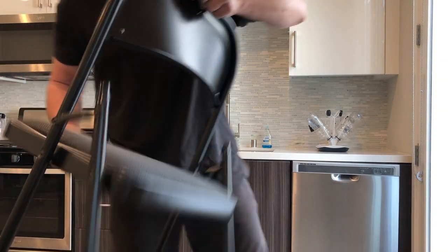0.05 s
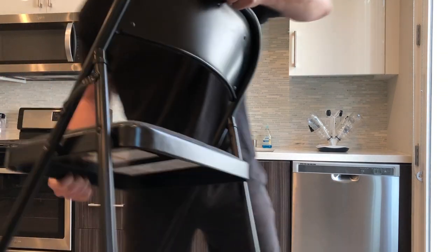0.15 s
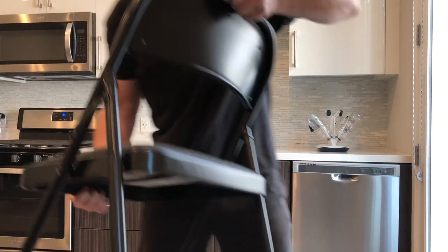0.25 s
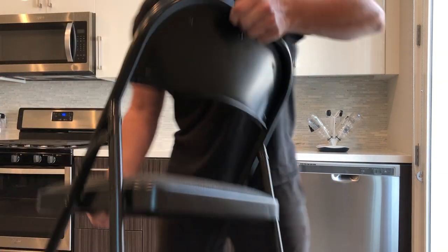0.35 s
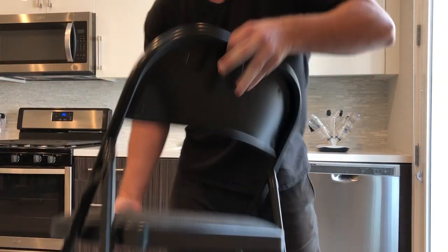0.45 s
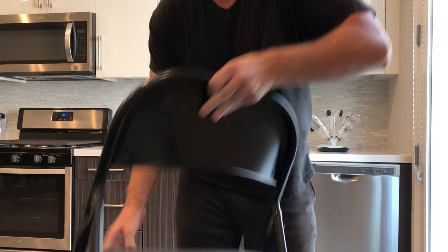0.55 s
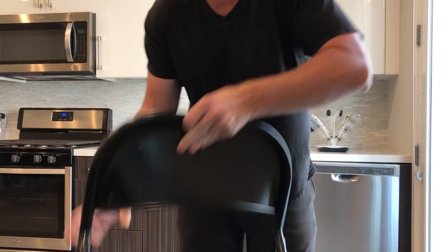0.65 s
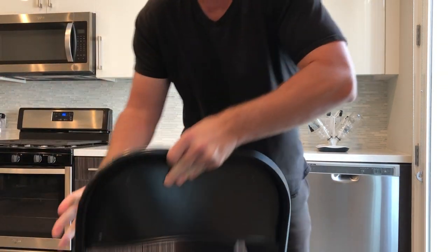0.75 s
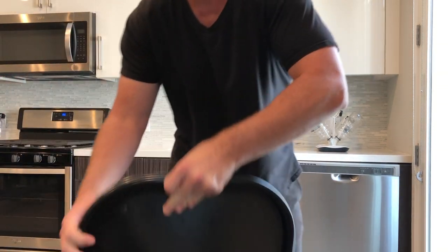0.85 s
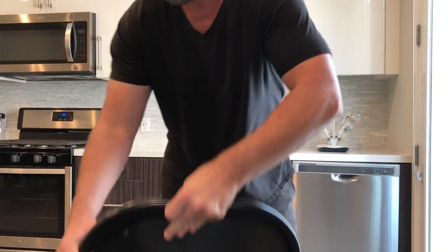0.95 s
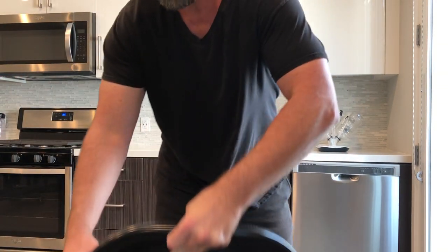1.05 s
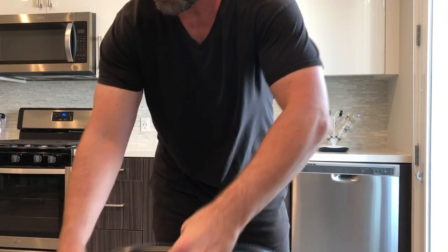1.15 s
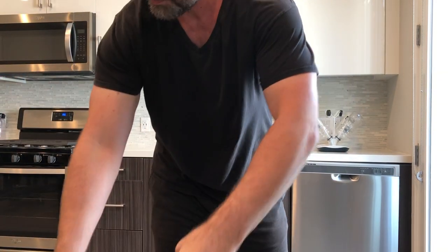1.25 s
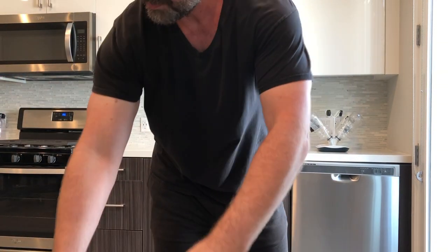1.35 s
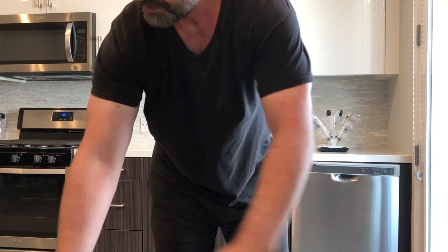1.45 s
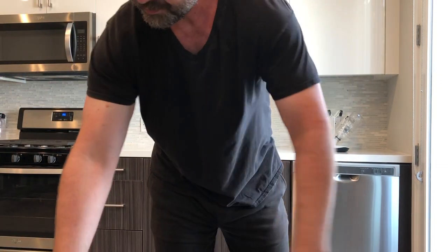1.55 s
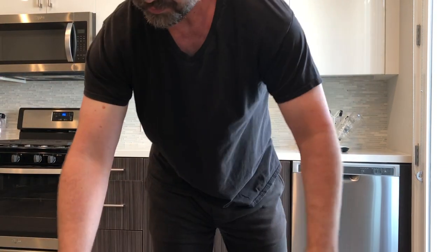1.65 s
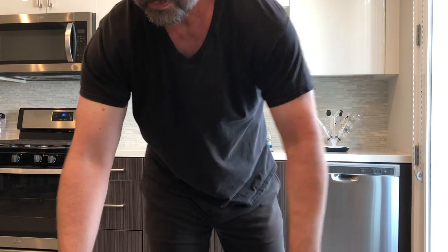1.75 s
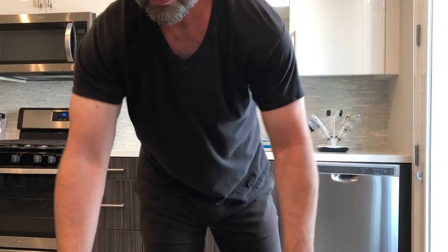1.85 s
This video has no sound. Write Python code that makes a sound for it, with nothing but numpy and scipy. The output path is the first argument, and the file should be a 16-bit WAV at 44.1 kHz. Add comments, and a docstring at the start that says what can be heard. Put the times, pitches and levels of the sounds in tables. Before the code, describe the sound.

A metal folding chair snaps open with a loud clack, then its feet knock on hard floor

```python
"""A metal folding chair clicks in its hinge, snaps open with a loud clack, then is set down: its feet
knock and skid on a hard kitchen floor, over faint air, rumble and rustling clothes. The room rings for
most of a second. Contacts are bursts of coloured noise; frame, tubes and legs are dying sines; echoes
are sparse taps decaying band by band. Both channels are the same."""
import sys
import numpy as np
from scipy import signal
from scipy.fft import rfft, irfft
from scipy.io import wavfile
from scipy.ndimage import uniform_filter1d

SR = 44100
rng = np.random.default_rng(int(sys.argv[2]) if len(sys.argv) > 2 else 0)


def generate_wav(sig):
    """Save sig (samples, or channels by samples) to the path in sys.argv[1] as 16-bit PCM at SR."""
    pcm = np.round(np.clip(np.atleast_2d(sig).T, -1, 1) * 32767).astype(np.int16)
    wavfile.write(sys.argv[1], SR, pcm)


def how_loud(loudness_db):
    """Turn decibels into a plain amplitude multiplier (0 dB gives 1, 20 dB gives 10)."""
    steps = np.asarray(loudness_db, float) / 20
    return 10 ** steps


N = 83790

# the seat hits its stop: (time [s], level [dB], length [s], rise [s], brightness [dB per octave])
CLACK_HITS = [(0.2467, -10.5, 0.008, 0.0011, 3.5), (.2485, -11, 0.0079, 0.0017, -3)]


def evened(x):
    """Scales to unit rms."""
    return x / np.sqrt(np.mean(x ** 2) + 1e-20)


def read(points, hz):
    """Interpolates a table on a log-frequency axis."""
    f, value = np.transpose(points)
    return np.interp(np.log(hz + 1), np.log(f + 1), value)


def add(mix, time_s, sound):
    """Adds a sound into the mix at a time, cut at the end."""
    part = mix[round(time_s * SR):][:len(sound)]
    part += sound[:len(part)]


def coloured(spectrum, count, tilt_db=0):
    """Noise of unit rms with a given spectrum, tilted in dB per octave."""
    hz = np.fft.rfftfreq(count, 1 / SR)
    gain_db = read(spectrum, hz) + tilt_db * np.log2(hz / 2000 + 0.064)
    white = rfft(rng.standard_normal(count))
    return evened(irfft(white * how_loud(gain_db), count))


def bursts(rows, spectrum, grain_db):
    """Each blow is a short rattle of uneven contacts: quick rise, quick fall."""
    out, t = np.zeros(N), np.arange(4096) / SR
    for time_s, db, length_s, rise_s, tilt_db in rows:
        wander = evened(uniform_filter1d(rng.standard_normal(len(t)), size=30))
        lumps = how_loud(grain_db * wander)
        shape = np.minimum(t / rise_s, 1) * np.exp(-(t / length_s) ** 2)
        add(out, time_s, how_loud(db) * shape * lumps * coloured(spectrum, len(t), tilt_db))
    return out


def rings(modes, length_s=1):
    """The sum of dying sines that a unit blow leaves."""
    t = np.arange(round(length_s * SR)) / SR
    return sum(how_loud(db - 60 * t / t60_s) * np.sin(2 * np.pi * hz * t) for hz, db, t60_s in modes)


def rung(x, modes, db):
    """A rattle passed through modes whose summed response has unit energy."""
    ring = rings(modes)
    return how_loud(db) * signal.fftconvolve(x, ring / np.linalg.norm(ring))[:N]


def rumble():
    """Low noise: slow noise on a quadrature carrier puts a band around a moving centre."""
    # (time [s], level [dB], centre [Hz])
    course = [(0, -41, 84), (.04, -60, 83), (.09, -50.5, 90), (.14, -71, 90), (0.171, -71, 86.4),
              (.9, -69.5, 59.7), (0.971, -51.5, 52.1), (1.05, -57, 46.16), (1.12, -60.5, 50.2),
              (1.18, -60, 49), (1.369, -75, 60.7), (1.43, -50, 64.2), (1.49, -80.5, 64.81), (1.55, -51, 69),
              (1.6, -47.5, 70.6), (1.7, -51.5, 72.9), (1.76, -65, 74.4), (1.9, -64, 62.4)]
    width_hz = 41
    time_s, db, hz = np.transpose(course)
    t = np.arange(N) / SR
    lowpass = signal.butter(2, width_hz / 2, fs=SR, output="sos")
    slow = signal.sosfilt(lowpass, rng.standard_normal((2, N)))
    phase = 2 * np.pi * np.cumsum(np.interp(t, time_s, hz)) / SR
    band = slow[0] * np.cos(phase) + slow[1] * np.sin(phase)
    return how_loud(np.interp(t, time_s, db)) * evened(band)


def air():
    """Air of the room: steady coloured noise."""
    # relative spectrum: (frequency [Hz], density [dB per Hz])
    spectrum = [(30, -29), (60, -15), (150, 8), (350, 3.5), (900, -6), (2500, -11.5), (6000, -19),
                (10000, -24.5), (16000, -39)]
    level_db = -60
    return how_loud(level_db) * coloured(spectrum, N)


def hinge_ticks():
    """Light metal contacts in the hinge: short noise bursts."""
    # (time [s], level [dB], length [s], rise [s], brightness [dB per octave])
    ticks = [(.1260, -40, 0.0067, 0.00063, 1.2), (.1966, -38.5, 0.0061, 0.002, -0.2),
             (.2290, -42.5, .012, .002, -5), (.600, -52.5, 0.018, .006, 2), (.665, -58, 0.022, .01, -2),
             (1.119, -68, 0.0039, 0.0011, -7)]
    # relative spectrum before tilt: (frequency [Hz], density [dB per Hz])
    spectrum = [(120, -31), (200, -12), (671, -34), (821, -11), (1420, -10.5), (1910, 2), (2250, -8),
                (4350, -16.5), (7270, -17.5), (9930, -22), (11700, -15), (16000, -24)]
    return bursts(ticks, spectrum, grain_db=2.5)


def tail():
    """Dense echoes that build up quickly, each band dying at its own speed; unit energy."""
    # decay of the room: (frequency [Hz], t60 [s])
    decay = [(80, 0.17), (210, 0.66), (560, 0.83), (1470, 0.83), (3880, 0.99), (7000, 0.73), (10500, 0.56),
             (16000, 0.32)]
    first_echo_s, build_s = 0.003, 0.0037
    taps = np.zeros(SR + SR // 2)
    at = np.arange(round(first_echo_s * SR), len(taps) - 8, 8)
    at = at + rng.integers(0, 8, len(at))
    taps[at] = rng.choice([-1., 1.], len(at))
    hz, t, z = signal.stft(taps, SR, nperseg=256)
    dying = z * how_loud(-60 * t / read(decay, hz)[:, None])
    echoes = signal.istft(dying, SR, nperseg=256)[1]
    echoes = echoes * (1 - np.exp(-np.arange(len(echoes)) / SR / build_s))
    return echoes / np.linalg.norm(echoes)


def room(rattle, steady):
    """Several random tails share the rattle in turn, which evens out the colour of the reverberation."""
    tails, turn_s = 6, 0.0014  # turn_s: time from one tail to the next
    turn = np.arange(N) / SR / turn_s
    out = signal.fftconvolve(steady, tail())[:N]
    for k in range(tails):
        away = np.abs((turn - k + tails / 2) % tails - tails / 2)
        share = np.cos(np.pi / 2 * np.minimum(away, 1))
        out += signal.fftconvolve(rattle * share, tail())[:N]
    return out


def clack():
    """The seat hits its stop: loud noise bursts."""
    # relative spectrum before tilt: (frequency [Hz], density [dB per Hz])
    spectrum = [(120, -47), (250, -18.5), (390, -6), (700, -9), (1100, -5), (1450, -10.5), (1800, -1),
                (2300, -14), (2850, -12), (3600, -16.5), (6300, -17), (8000, -19), (12000, -26.5),
                (14300, -22), (16500, -38.5)]
    return bursts(CLACK_HITS, spectrum, grain_db=3)


def tubes():
    """The clack sets the tubes ringing thinly, each mode with its own phase."""
    # (frequency [Hz], level [dB], t60 [s])
    modes = [(1238, -35, .3), (1270, -39, .5), (1610, -38, .7), (1675, -33, .75), (1707, -32, .8),
             (1738, -31, .8), (1765, -34, .7), (1790, -32, .7), (1840, -32, .75), (1890, -31, .5),
             (1928, -35, .55), (2060, -38, .4), (2985, -43, .4), (4102, -51, 1.15), (4118, -53, 1.0),
             (4165, -49, .7)]
    out, t = np.zeros(N), np.arange(SR) / SR
    rise = np.minimum(t / 0.0037, 1)
    for (hz, db, t60_s), start in zip(modes, rng.random(len(modes))):
        tone = np.sin(2 * np.pi * (hz * t + start))
        add(out, CLACK_HITS[-1][0], rise * how_loud(db - 60 * t / t60_s) * tone)
    return out


def body():
    """Soft pushes shake low modes near a centre, each detuned slightly at random to blur the thuds."""
    # (time [s], level [dB], centre of the modes reached [Hz])
    pushes = [(0.253, -30.5, 425), (0.2648, -23.5, 156), (.2660, -23.5, 420), (0.276, -31, 380),
              (.290, -32.5, 103), (.603, -44, 392), (.62, -53, 152), (1.195, -53.5, 247),
              (1.203, -39.5, 148), (1.23, -49, 190), (1.255, -39.5, 208), (1.349, -45, 147),
              (1.388, -40.5, 510), (1.403, -41, 192), (1.457, -44.5, 188), (1.484, -51, 337),
              (1.555, -39.5, 406), (1.569, -44, 294), (1.642, -39, 220), (1.657, -42.5, 296.4),
              (1.692, -51, 220), (1.731, -51.5, 217)]
    # low modes of frame and seat before detuning: (frequency [Hz], relative level [dB], t60 [s])
    modes = [(72, -4, .25), (100, -2, .25), (142, -1, .4), (175, -4, .12), (204, -5, .3), (290, -5, .2),
             (321, -5, .2), (350, -7, .09), (385, -4, .11), (420, -5, .09), (468, -4, .12), (525, -5, .14)]
    reach_oct, detune, swell_s = 0.48, 0.022, 0.0021  # 6 dB down at reach_oct; detune: rms ratio
    thud_db, thud_s = 8, 0.027  # quickly damped thud on top of each push
    out, t = np.zeros(N), np.arange(SR // 2) / SR
    shifts = rng.standard_normal((len(pushes), len(modes)))
    shape = (1 - np.exp(-t / swell_s)) * (1 + how_loud(thud_db) * np.exp(-t / thud_s))
    for (time_s, db, centre_hz), shift in zip(pushes, shifts):
        reached = []
        for (hz, mode_db, t60_s), d in zip(modes, shift):
            loss_db = 6 * (np.log2(hz / centre_hz) / reach_oct) ** 2
            reached.append((hz * (1 + detune * d), db + mode_db - loss_db, t60_s))
        add(out, time_s, shape * rings(reached, 0.5))
    return out


def rustle():
    """Clothing rustles: coloured noise under a moving level."""
    # (time [s], level [dB])
    course = [(.86, -88), (.90, -59), (.92, -61), (.955, -55.5), (1.0, -59.5), (1.06, -63.5), (1.119, -69)]
    # relative spectrum: (frequency [Hz], density [dB per Hz])
    spectrum = [(180, -21), (300, -2), (762, -8), (978, -3), (1060, -4), (2980, -10), (16000, -25)]
    time_s, db = np.transpose(course)
    level_db = np.interp(np.arange(N) / SR, time_s, db, left=-120, right=-120)
    return how_loud(level_db) * coloured(spectrum, N)


def feet():
    """Feet knock and skid on the floor: uneven noise bursts."""
    # (time [s], level [dB], length [s], rise [s], brightness [dB per octave])
    knocks = [(1.1893, -42.5, 0.0083, 0.00097, 0), (1.1970, -35, 0.01, 0.00066, 0.3),
              (1.222, -41, 0.016, 0.0065, -4.5), (1.3425, -42.5, 0.0082, 0.0013, 1),
              (1.3500, -33.5, 0.012, 0.0069, -1.2), (1.3830, -48.5, 0.012, 0.0045, 4),
              (1.4395, -41, 0.0078, 0.0025, -0.7), (1.485, -42, 0.033, 0.012, -13),
              (1.5555, -41.5, 0.0075, 0.0013, 3), (1.5580, -37, 0.014, 0.0033, -1),
              (1.5670, -34, 0.011, 0.0057, -3.3), (1.640, -75, .015, 0.0037, -8),
              (1.6567, -36.5, 0.0068, 0.00099, -1.5), (1.664, -41, 0.013, 0.0021, 0),
              (1.695, -55, 0.027, 0.005, -25)]
    # relative spectrum before tilt: (frequency [Hz], density [dB per Hz])
    spectrum = [(120, -36), (250, -7), (500, -10.5), (900, -12.5), (2000, -13), (3100, -17), (3800, -27),
                (5300, -23.5), (8000, -24), (9800, -20.5), (11000, -28.5), (14000, -22.5), (16500, -35.5)]
    return bursts(knocks, spectrum, grain_db=4.5)


def legs(knocks):
    """The knocks excite short rings of the leg ends."""
    # (frequency [Hz], relative level [dB], t60 [s])
    modes = [(1140, -8, .06), (1945, -6, .08), (3150, -6, .05), (5150, -5, .08), (6300, -8, .06),
             (7300, -6, .09), (8100, -6, .11), (8800, -6, .07), (9900, -5, .08)]
    return rung(knocks, modes, db=-7.5)


def scene():
    """Chair, room and background, the same in both channels."""
    wet_db, body_wet_db = 0.5, -4
    knocks = feet()
    rattle = hinge_ticks() + clack() + knocks
    ringing = tubes() + body() + legs(knocks)
    echoes = room(how_loud(wet_db) * rattle, how_loud(body_wet_db) * ringing)
    mono = rattle + ringing + echoes + air() + rustle() + rumble()
    return np.array([mono, mono])


def roll_off(x):
    """The treble ends steeply here."""
    return signal.sosfilt(signal.butter(12, 16960, fs=SR, output="sos"), x)


def record(dry):
    """Bass cut and band limit of the microphone, with soft overload on the peaks."""
    bass_cut_hz, edge_hz, ceiling = 60, 15900, 0.67  # ceiling: full scale is 1
    highpass = signal.butter(3, bass_cut_hz, "high", fs=SR, output="sos")
    thin = signal.sosfilt(highpass, dry)
    soft = ceiling * np.tanh(thin / ceiling)
    lowpass = signal.firwin(255, edge_hz, window=("kaiser", 9), fs=SR)
    limited = signal.oaconvolve(soft, lowpass[None], "same")
    return roll_off(limited)


dry = scene()
out = record(dry)
generate_wav(out)
```